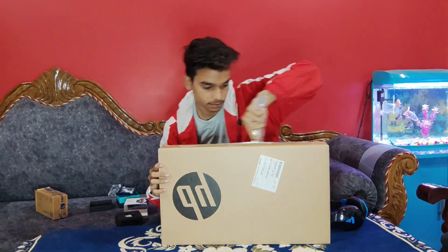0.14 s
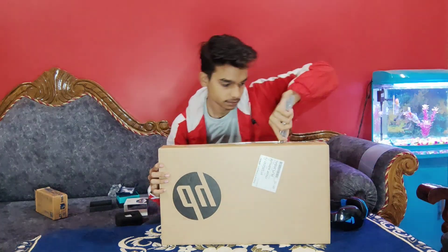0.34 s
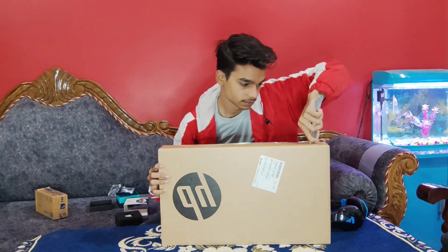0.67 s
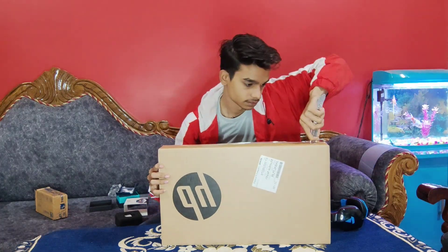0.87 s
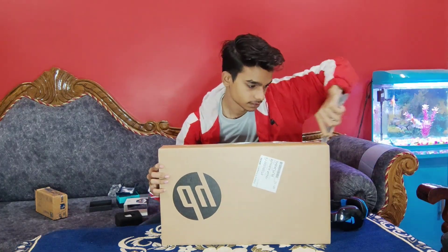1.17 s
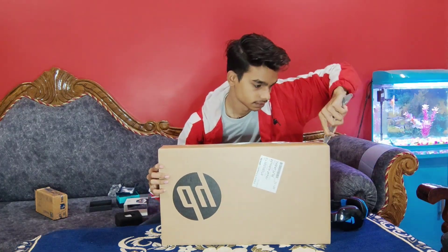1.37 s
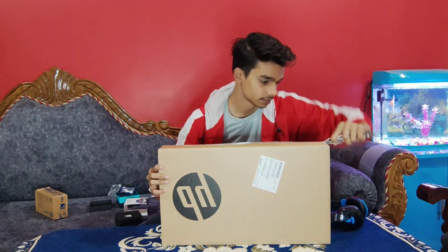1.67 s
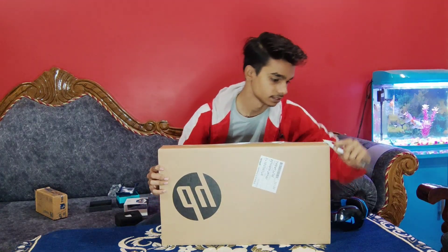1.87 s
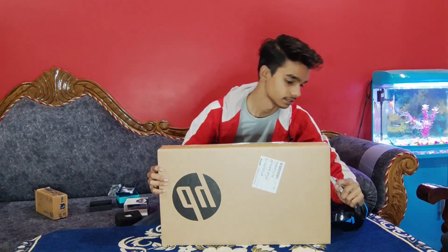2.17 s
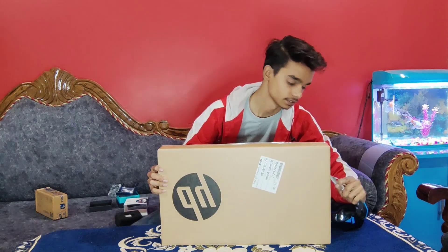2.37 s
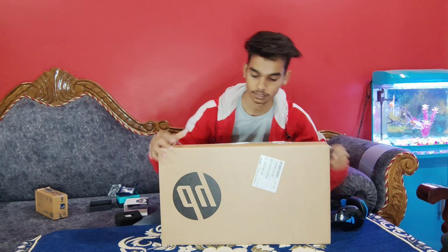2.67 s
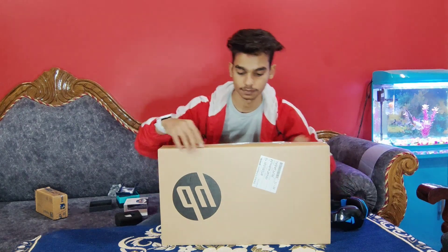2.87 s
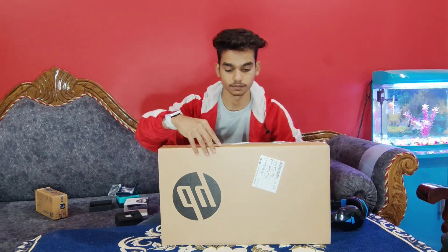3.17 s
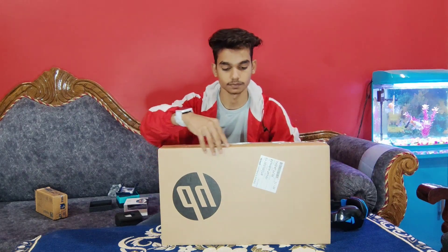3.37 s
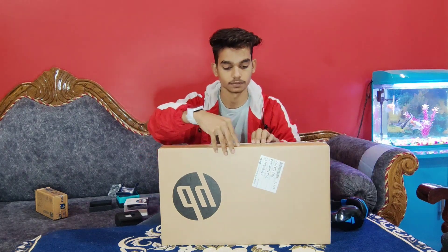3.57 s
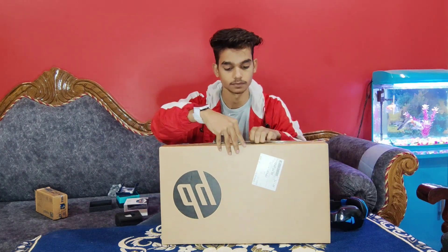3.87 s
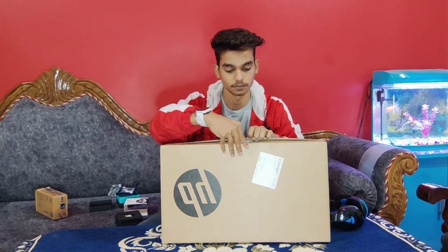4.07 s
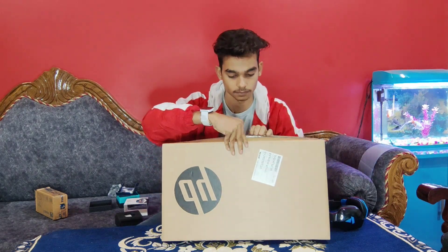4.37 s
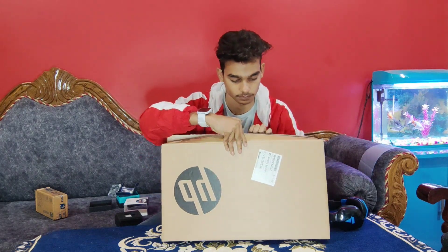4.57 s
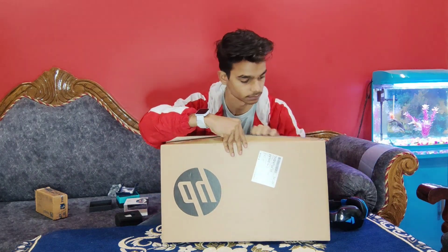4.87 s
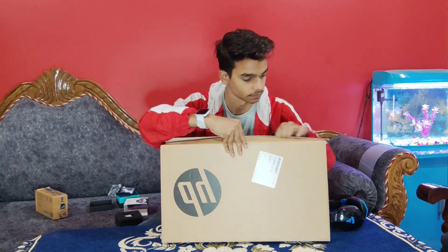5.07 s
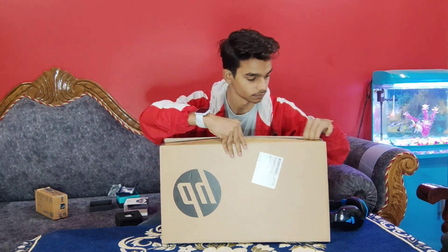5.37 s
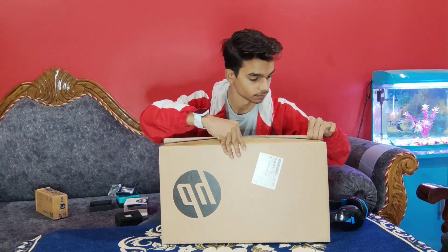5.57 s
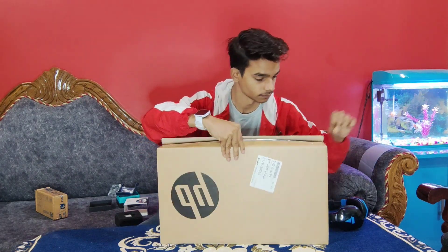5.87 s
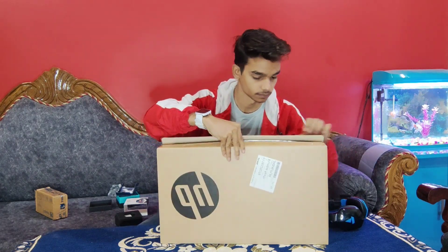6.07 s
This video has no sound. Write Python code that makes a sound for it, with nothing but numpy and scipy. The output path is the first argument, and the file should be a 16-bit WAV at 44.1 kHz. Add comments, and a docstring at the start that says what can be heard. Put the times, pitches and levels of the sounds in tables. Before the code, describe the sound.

A blade saws raspily along a taped cardboard box amid hollow knocks, then tape crackles and two loud pops burst the joints open.

```python
"""Opening a taped cardboard box

A furnished room, one close microphone channel on a flat cardboard box, its echoes faint behind. A blade saws and
slides along the taped seam, hands tap the box and pull the flaps, tape crackles and snaps, two joints pop open.
Noisy contacts ring tuned panels, random clicks make rasp, hiss and rustle, and low sines and modes boom in the
hollow. A limiter holds the loudest pops and a noise suppressor cuts the tails short."""
import sys
import numpy as np
from scipy import signal
from scipy.fft import rfft, irfft
from scipy.io import wavfile
from scipy.ndimage import uniform_filter1d, minimum_filter1d

SR = 44100
rng = np.random.default_rng(int(sys.argv[2]) if len(sys.argv) > 2 else 0)


def dump_mix(stems):
    """Bounce the given channels to the path in sys.argv[1] as a 16-bit WAV at rate SR."""
    frames = np.atleast_2d(stems).T  # one column per channel
    limited = np.clip(frames, -1, 1)  # hard clip at full scale
    pcm = np.round(limited * 32767).astype(np.int16)
    wavfile.write(sys.argv[1], SR, pcm)


N = 274572

# Strokes of blade, fingers and peeling tape. Each row: start in seconds, length in seconds, attack in seconds,
# panel level in dB, touched panel pitch in Hz, rasp level in dB, bright hiss in dB relative to the rasp,
# fade of the rasp in dB per second (negative grows).
STROKES = [(-.04, 0.22, 0.07, -15.5, 700, -31.5, -20, 14), (0.19, 0.064, 0.029, -29, 490, -37.5, -25.5, -9),
           (0.247, 0.24, 0.039, -21, 534, -32.5, -18.5, 5), (0.5, 0.25, 0.051, -45, 586, -43, -24, -31.5),
           (0.588, 0.27, 0.015, -37, 840, -31, -16, 45),
           (1.062, 0.15, 0.035, -39.5, 320, -73.5, -28.5, -6.5),
           (1.201, 0.18, 0.026, -52.5, 1110, -40, -12.5, -55),
           (2.256, 0.048, 0.014, -38, 1190, -53.5, -13.5, 37), (3.401, 0.12, 0.043, -42, 1095, -77, 21, 46),
           (3.422, 0.13, 0.035, -31, 270, -81, -26, 36), (3.927, 0.034, 0.023, -51, 887, -42, 3, 38),
           (4.004, 0.2, 0.015, -37.5, 940, -43.5, -15.5, -7),
           (4.253, 0.083, 0.023, -35, 730, -66.5, -3, -26), (4.766, 0.39, 0.014, -31, 360, -88, -36, 6),
           (5.024, 0.16, 0.064, -26, 1480, -30, -15.5, 58),
           (5.137, 0.2, 0.051, -30.5, 820, -32.5, -23.5, 41.5),
           (5.33, 0.28, 0.065, -31, 830, -28, -28, 28.5)]
# The box shifts under the hands. Each row: time in seconds, rumble level in dB.
HANDLING = [(0, -35), (1.0, -45.5), (1.15, -30.5), (1.38, -35), (1.55, -45), (2.1, -47.5), (2.8, -71.5),
            (3.3, -59), (4.8, -52.5), (5.2, -33), (5.55, -43.5), (6.2, -41.5)]
# Blows on the box. Each row: start in seconds, peak in dB, pitch in Hz of the panels nearest the contact,
# scuff in dB relative to the peak, rattle drive in dB.
BLOWS = [(.072, 0.5, 572, -32, -37), (.088, 1, 950, -37, -37), (.108, -8, 620, -36, -23),
         (.142, -2.5, 305, -39, -39.5), (.275, -6.5, 696, -48, -5), (.332, 2.5, 559, -38, -16),
         (.386, -5.5, 347, -20, -10.5), (.604, -14, 900, -12.5, -14), (.667, -9, 497, -26, -17.5),
         (.676, -3.5, 965, -11, -26), (.694, -1.5, 925, -37.5, -10.5), (1.93, -12.5, 650, -19, -8),
         (2.890, -13.5, 832, -26, -9), (2.995, -54.5, 1265, 18, -12.5), (3.407, -7, 599.4, -30, -1.5),
         (3.722, -32, 742, -17, -12), (5.068, -22, 760, -13, -7), (5.195, -21.5, 846, -16, -37),
         (5.41, -24, 309, 0.5, -5)]
# The whole box is jolted. Each row: start in seconds, peak in dB, pitch in Hz.
JOLTS = [(0.616, -20.5, 56.5), (1.394, -32.5, 60.74), (3.45, -24.5, 73.7), (3.542, -23, 86.4),
         (4.712, -24, 97), (5.856, -10.5, 52.8), (6.061, -29, 66.5)]
# The blade glides through the tape. Each row: start in seconds, length in seconds, starting level in dB.
GLIDES = [(1.061, 0.54, -34), (1.166, 0.254, -20)]
# Faint thin rustles. Each row: start in seconds, peak in dB, pitch in Hz, time to fall 60 dB in seconds.
RUSTLES = [(1.749, -47.5, 4100, 0.57), (1.945, -34, 3914, 0.22), (2.11, -59, 4100, 0.71),
           (2.5945, -47.5, 7890, 0.36), (2.901, -52, 4205, 0.52), (3.406, -23.5, 7400, 0.077),
           (4.413, -53.5, 5070, 0.028), (4.469, -50.5, 4500, 0.038)]
# Short snaps of tape and stiff board. Each row: start in seconds, peak in dB, panel pitch in Hz,
# scuff in dB relative to the peak, rattle drive in dB.
SNAPS = [(3.934, -28.5, 1197, 1.5, -13), (4.007, -21, 1820, -3, -40.5), (4.023, -14, 1720, -16, -14),
         (4.031, -18, 895, 1.5, -12), (4.056, -14, 905, -1, -21.5), (4.095, -11, 900, 2, -16),
         (4.303, -14.5, 750, -34, -32), (4.324, -12.5, 634, -30, -24)]
# Taped joints pop open and shake every panel. Each row: start in seconds, peak in dB, panel pitch in Hz,
# scuff in dB relative to the peak, rattle drive in dB.
POPS = [(4.7035, 13.8, 636.5, -7, -24), (5.8475, 11.7, 599, 8.5, -42), (5.864, 4.2, 874, -35, -25.5),
        (5.893, 7.8, 685, -18.5, -16)]

# Modes of the cardboard panels. Each row: frequency in Hz, level in dB.
PANELS = [(185, -8.5), (262, 3.5), (305, 14), (352, 10), (420, 5.5), (480, 8), (555, 5.5), (630, 4.5),
          (793, 8), (858, 12), (1030, 5), (1260, 9.5), (1390, 7), (1640, 10.5), (1960, 12), (2380, -16.5)]
# Thin panels that sing under a stroke. Each entry: frequency in Hz.
RUBBED_HZ = [867, 1404, 1788, 2050]
# Air modes of the hollow box. Each entry: frequency in Hz.
HOLLOW_HZ = [61, 79.7, 105.9]
# Spectrum of tearing fibres. Each row: frequency in Hz, level in dB per Hz.
FIBRES = [(710, -30.5), (1200, -38), (1390, -4), (1550, -14), (2190, -13.5), (4220, -14), (5380, -27.5),
          (7310, -27), (9230, -23), (10400, -34.5), (13800, -31.5), (14500, -39.5), (15000, -70.5)]
# Treble resonances of the microphone, heard in the scuffs. Each row: frequency in Hz, level in dB.
MIC_TREBLE = [(3000, -9), (4150, 1.5), (7200, -1.5), (9400, -4)]
# Spectrum of slit tape. Each row: frequency in Hz, level in dB per Hz.
SLIT_TAPE = [(2400, -23.5), (2900, -2.5), (6200, -0.5), (7700, -9.5), (8400, -20.5), (14000, -44)]
# Spectrum of the tape in snaps and pops. Each row: frequency in Hz, level in dB per Hz.
SNAPPED_TAPE = [(900, -12.5), (2200, 15.5), (5500, 1.5), (13800, -7), (15000, -50.5)]
# Echoes of the room. Each row: band frequency in Hz, time to fall 60 dB in seconds, echo level in dB.
ROOM = [(108.8, 0.3, -20.5), (504, 0.3, -31.5), (2260, 0.4, -28), (6555, 0.21, -28)]
# Spectrum of the quiet air. Each row: frequency in Hz, level in dB per Hz.
AIR = [(59, -3), (100, 3), (229, -11), (416, -25), (759, -27), (14000, -39)]
# Threshold of the noise suppressor. Each row: frequency in Hz, level in dB per bin.
HUSH_BELOW = [(60, -56.5), (500, -87), (2000, -88), (14000, -94.5)]

STRUCK_CYCLES, RUBBED_CYCLES, TOUCHED_CYCLES = 12, 30, 34   # cycles in which a panel falls 60 dB
TOUCHED_DB = 10   # extra ring of the touched panel itself
# How far in octaves a contact spreads from its nearest panel, and the least that any panel is driven.
BLOW_OCTAVES, POP_OCTAVES, SNAP_OCTAVES, STROKE_OCTAVES = 0.77, 1.9, 0.69, 0.61
REACH_FLOOR_DB = -24
# Contact lengths hold at CONTACT_HZ; stiffer, higher panels throw the contact off sooner.
CONTACT_S, SNAP_CONTACT_S, CONTACT_HZ, CONTACT_LAW = 0.012, 0.0071, 569.6, 0.63
STRENGTH_SPREAD_DB = 4.0   # no two contacts ring the panels alike
PANEL_TOP_HZ = 1605   # struck board moves little air above this
PANEL_FADE, HISS_FADE = 2.2, 0.9   # dB lost by panels and by hiss for each dB the rasp fades
STROKE_RELEASE_S = 0.018
COARSE_SPREAD_DB, RASP_FLICKER_DB = 4.0, 1.2   # unevenness of coarse grains, flicker of the rasp
WANDER_DB = 4.0   # each rubbed panel swells and sinks as the contact travels
PATCH_DB = 3.0   # the rasp's colour wanders band by band
PATCH_HZ = np.geomspace(1000, 7400, num=11)   # edges of those bands
GLIDE_ATTACK_S, GLIDE_RELEASE_S, GLIDE_FADE_DB_PER_S = 0.061, 0.0089, 95.5
AIR_DB, HUSH_DEPTH_DB, CUTOFF_HZ = -53, -12, 15612


def from_db(db):
    """Decibels to gain."""
    return np.exp(np.asarray(db) * (np.log(10) / 20))


def rms_one(x):
    """Scale to rms 1."""
    return x / np.sqrt(np.mean(x ** 2) + 1e-20)


def peak_one(x):
    """Scale to peak 1."""
    return x / (np.abs(x).max() + 1e-20)


def colour(x, spectrum):
    """Shape x by a table of dB per Hz, straight between points in log frequency."""
    hz, db = np.transpose(spectrum)
    grid = np.maximum(np.fft.rfftfreq(len(x), 1 / SR), 1)
    gain = from_db(np.interp(np.log(grid), np.log(hz), db))
    return irfft(rfft(x) * gain, len(x))


def band(x, low_hz, high_hz):
    """Band-pass."""
    return signal.sosfilt(signal.butter(2, [low_hz, high_hz], "band", fs=SR, output="sos"), x)


def ring(force, hz, t60):
    """A damped mode: a unit click sets a sine of height 1 ringing, 60 dB down after t60 seconds."""
    radius, angle = from_db(-60 / (t60 * SR)), 2 * np.pi * hz / SR
    return signal.lfilter([0, np.sin(angle)], [1, -2 * radius * np.cos(angle), radius ** 2], force + 1e-18)


def grains(per_s, spread_db, size=N):
    """Random clicks of uneven size and either sign."""
    sizes = from_db(spread_db * np.minimum(rng.exponential(1, size), 5)) * rng.choice([-1, 1], size)
    return sizes * (rng.random(size) < per_s / SR)


def flicker(low_hz, high_hz):
    """Slow random wander of rms 1."""
    return rms_one(band(rng.standard_normal(N), low_hz, high_hz))


def reach(hz, contact_hz, octaves):
    """Panels tuned near the touched one are driven hardest."""
    return np.exp(-.5 * (np.log2(hz / contact_hz) / octaves) ** 2) + from_db(REACH_FLOOR_DB)


def held(s, length, attack, release):
    """Gain that rises, holds and dies away, with the time since its start, stopped at its length."""
    t = np.arange(N) / SR - s
    gain = np.clip(t / attack, 0, 1) ** 2 * np.exp(-np.maximum(t - length, 0) / release)
    return gain, np.clip(t, 0, length)


def add(out, s, x):
    """Mix x into out from time s."""
    i = round(s * SR)
    out[i:i + len(x)] += x[:N - i]


def stroke_controls():
    """Each stroke bites, fades or grows, then lets go: panel gain, pitch touched, rasp gain and hiss gain."""
    panel, rasp, hiss, pitch = np.full((4, N), 1e-12)
    for s, length, attack, panel_db, hz, rasp_db, bright_db, fade in STROKES:
        gain, t = held(s, length, attack, STROKE_RELEASE_S)
        here = gain * from_db(panel_db - PANEL_FADE * fade * t)
        panel = panel + here
        pitch = pitch + here * hz
        rasp = rasp + gain * from_db(rasp_db - fade * t)
        hiss = hiss + gain * from_db(rasp_db + bright_db - HISS_FADE * fade * t)
    # overlapping strokes share one pitch, weighted by their panel gain
    return panel, np.maximum(pitch / panel, 1), rasp, hiss


def patchy(x):
    """Each band swells and sinks in its own time as the contact moves over the board."""
    out = np.zeros(N)
    for k, (low, high) in enumerate(zip(PATCH_HZ, PATCH_HZ[1:])):
        sign = (-1) ** k   # neighbouring bands alternate
        out += sign * band(x, low, high) * from_db(PATCH_DB * flicker(1, 6))
    return out


def rubbed_panels(contact_hz):
    """Coarse grains ring the panels, those near the touched pitch most, at a steady overall level."""
    weights = [from_db(db + WANDER_DB * flicker(3.0, 17)) * reach(hz, contact_hz, STROKE_OCTAVES)
               for hz, db in PANELS]
    total = np.sqrt(sum(w ** 2 for w in weights))
    out = np.zeros(N)
    for weight, (hz, _) in zip(weights, PANELS):
        out += weight * rms_one(ring(grains(900, COARSE_SPREAD_DB), hz, RUBBED_CYCLES / hz))
    return out / total


def strokes():
    """Fibres snap in dense grains: coarse ones ring the panels, fine ones rasp and hiss."""
    panel_gain, contact_hz, rasp_gain, hiss_gain = stroke_controls()
    judder_db = 1.5 * flicker(15, 90)   # the contact sticks and slips
    panels = rubbed_panels(contact_hz)
    fine = colour(grains(5000, 0.59), FIBRES)
    singing = sum(rms_one(ring(fine, hz, 0.06)) * from_db(WANDER_DB * flicker(2, 9)) for hz in RUBBED_HZ)
    rasp = rms_one(rms_one(patchy(fine)) + 0.65 * rms_one(singing))
    rasp = rasp * from_db(RASP_FLICKER_DB * flicker(21, 60))
    hiss = rms_one(band(fine, 6900, 11000)) * from_db(0.5 * flicker(24, 40))
    return from_db(judder_db) * (panel_gain * panels + rasp_gain * rasp + hiss_gain * hiss)


def handling():
    """Lumpy pushes of the hands keep the hollow and the lowest panels murmuring."""
    push = rng.standard_normal(N) * from_db(np.clip(2.5 * flicker(3, 15), -5, 5))
    boom = sum(ring(push, hz, 0.79) for hz in HOLLOW_HZ)
    low_panels = band(push, 70, 250)
    s, rumble_db = np.transpose(HANDLING)
    level = from_db(np.interp(np.arange(N) / SR, s, rumble_db))
    return level * (rms_one(boom) + from_db(-3.5) * rms_one(low_panels))


def quiet_air():
    """Steady coloured noise lies under everything, its level flickering slightly."""
    level = from_db(AIR_DB + 0.8 * flicker(6.9, 21.0))
    return level * rms_one(colour(rng.standard_normal(N), AIR))


def room(x):
    """Diffuse echoes after a first gap, dying band by band."""
    t = np.arange(SR // 2) / SR
    tail = np.zeros(len(t))
    for hz, t60, db in ROOM:
        echo = band(rng.standard_normal(len(t)), 0.29 * hz, min(2.31 * hz, 15000)) * from_db(-60 * t / t60)
        tail += from_db(db) * echo / np.linalg.norm(echo)
    gap = np.zeros(round(0.0053 * SR))
    return signal.fftconvolve(x, np.concatenate([gap, tail]))[:N]


def knock_panels(force, hz, octaves):
    """One force a panel rings the modes near the contact, and the touched panel rings on."""
    knock = from_db(TOUCHED_DB) * ring(force[0], hz, TOUCHED_CYCLES / hz)
    for push, (mode_hz, db) in zip(force, PANELS):
        drive = from_db(db) * reach(mode_hz, hz, octaves) * np.sqrt(mode_hz / hz)
        knock = knock + drive * ring(push, mode_hz, STRUCK_CYCLES / mode_hz)
    for twice in range(2):   # little air moves far from the pitch of the contact
        knock = band(knock, 0.32 * hz / (1 + octaves), 5.2 * hz * (1 + octaves))
    top = signal.butter(8, max(PANEL_TOP_HZ, 2.0 * hz), fs=SR, output="sos")
    return signal.sosfilt(top, knock)


def blows(rows, octaves, grit, contact_s, tick):
    """Each contact is a short force, then the flaps rattle on: both ring the panels and scuff the surface."""
    out, t = np.zeros(N), np.arange(SR // 4) / SR
    for s, peak_db, hz, scuff_db, rattle_db in rows:
        phase = t / (contact_s * (CONTACT_HZ / hz) ** CONTACT_LAW)   # 1 when the contact ends
        # low panels swell, high ones snap
        contact = phase ** (.5 * (CONTACT_HZ / hz) ** 2) * np.clip(1 - phase, 0, 1)
        rattle = from_db(rattle_db) * np.minimum(phase, 1) * np.exp(-t / 0.055) * (1 - t / t[-1])
        shape = contact + rattle
        # the contact slips in step with the touched panel
        slips = 0.15 * contact * (np.sin(2 * np.pi * hz * t) + 0.6 * np.sin(4 * np.pi * hz * t))
        force = rng.standard_normal((len(PANELS), len(t))) * shape + slips
        force = force * from_db(STRENGTH_SPREAD_DB * rng.standard_normal((len(PANELS), 1)))
        knock = knock_panels(force, hz, octaves)
        start = rng.integers(N - len(t))   # a random stretch of grit for each contact
        scuff = grit[start:start + len(t)] * (shape + tick * np.exp(-t / 0.0024))
        add(out, s, from_db(peak_db) * (peak_one(knock) + from_db(scuff_db) * peak_one(scuff)))
    return out


def jolts():
    """A soft push rocks the box and the air in it swells to a boom."""
    out, t = np.zeros(N), np.arange(SR // 2) / SR
    for s, peak_db, hz in JOLTS:
        boom = t * np.exp(-t / 0.022) * np.sin(2 * np.pi * hz * t)
        add(out, s, from_db(peak_db) * peak_one(boom))
    return out


def glide():
    """The tape parts under the blade in very dense fine clicks, a bright hiss."""
    level = np.zeros(N)
    for s, length, db in GLIDES:
        gain, t = held(s, length, GLIDE_ATTACK_S, GLIDE_RELEASE_S)
        level += gain * from_db(db - GLIDE_FADE_DB_PER_S * t)
    hiss = rms_one(colour(grains(12000, 0.67), SLIT_TAPE))
    return level * from_db(2.3 * flicker(13, 120)) * hiss


def rustles():
    """Short sprays of fine clicks in a narrow high band."""
    out, t = np.zeros(N), np.arange(SR // 4) / SR
    for s, peak_db, hz, t60 in RUSTLES:
        spray = band(grains(4500, 3.3, size=len(t)), 0.95 * hz, 1.044 * hz)
        spray = spray * from_db(-60 * t / max(t60, .01))
        add(out, s, from_db(peak_db) * peak_one(spray))
    return out


def hush(x):
    """A noise suppressor turns down every band that sinks under its threshold, cutting tails short."""
    hz, _, bins = signal.stft(x, SR, nperseg=512)
    power = uniform_filter1d(np.abs(bins) ** 2, size=7, axis=-2)   # smooth over frequency
    power = uniform_filter1d(power, size=3, axis=-1)   # and over time
    edge_hz, edge_db = np.transpose(HUSH_BELOW)
    threshold = from_db(2 * np.interp(np.log(hz + 1), np.log(edge_hz), edge_db))   # as power
    over = (power / threshold[:, None]) ** 2
    gain = (over + from_db(HUSH_DEPTH_DB)) / (over + 1)
    return signal.istft(bins * gain, SR, nperseg=512)[1][..., :N]


def scene():
    """The box under blade and hands, its echoes in the room and a quiet air."""
    scuffs = sum(from_db(db) * rms_one(ring(rng.standard_normal(N), hz, 0.0048)) for hz, db in MIC_TREBLE)
    scuffs = band(scuffs, 1100, 12000)
    tape = colour(rng.standard_normal(N), SNAPPED_TAPE)
    box = strokes() + glide() + rustles()
    box = box + blows(BLOWS, BLOW_OCTAVES, scuffs, CONTACT_S, tick=0.24)
    box = box + blows(SNAPS, SNAP_OCTAVES, tape + 0.34 * scuffs, SNAP_CONTACT_S, tick=0.41)
    box = box + blows(POPS, POP_OCTAVES, tape, CONTACT_S, tick=1.0)
    return (box + room(box) + jolts() + handling() + quiet_air())[None]


def record(dry):
    """A quick limiter holds the peaks, faint sound is hushed, the top is cut."""
    headroom = np.minimum(1, .97 / (np.abs(dry) + 1e-9))
    gain = uniform_filter1d(minimum_filter1d(headroom, size=201), size=101)
    low_pass = signal.cheby2(12, 70, CUTOFF_HZ, fs=SR, output="sos")
    return signal.sosfilt(low_pass, hush(gain * dry))


dry = scene()
out = record(dry)
dump_mix(out)
```